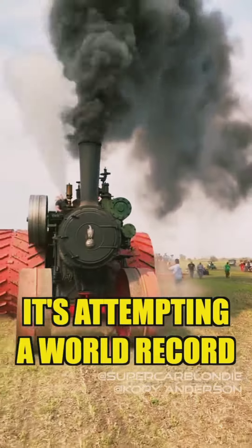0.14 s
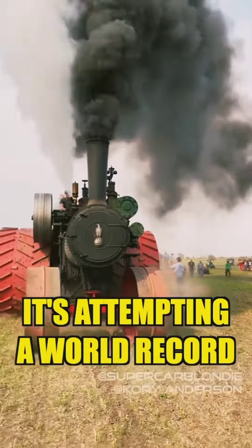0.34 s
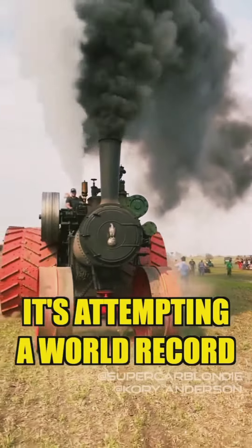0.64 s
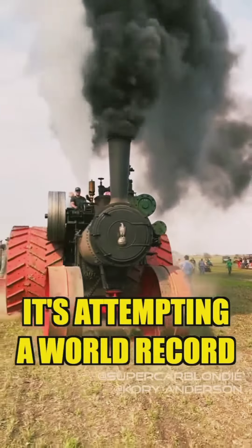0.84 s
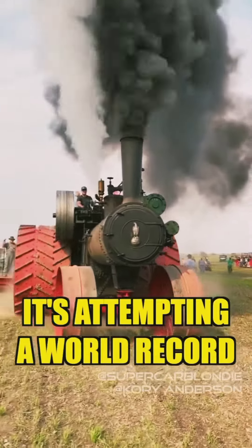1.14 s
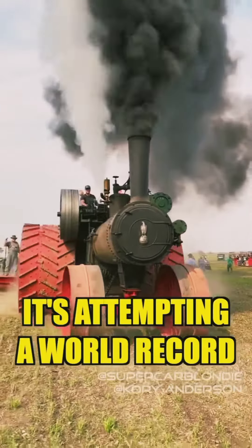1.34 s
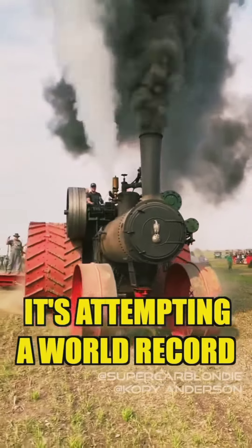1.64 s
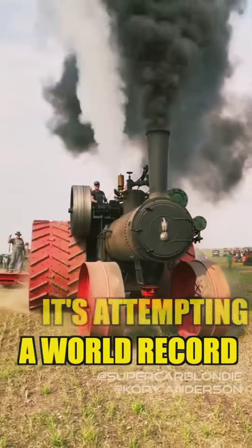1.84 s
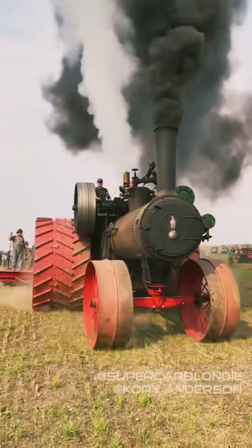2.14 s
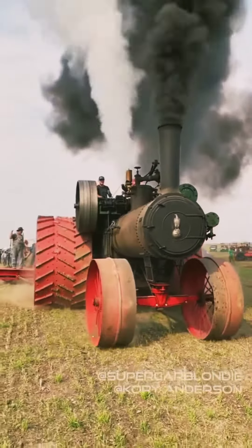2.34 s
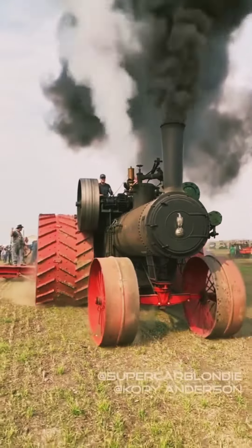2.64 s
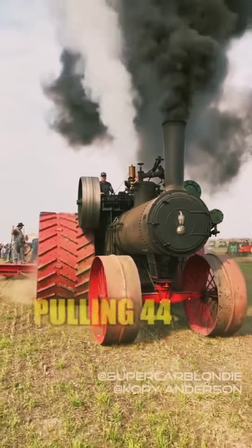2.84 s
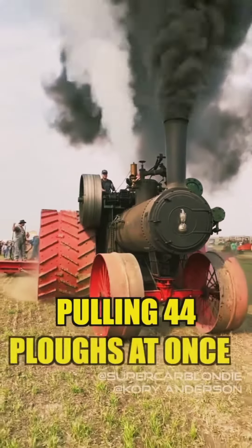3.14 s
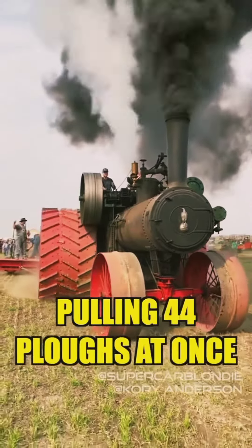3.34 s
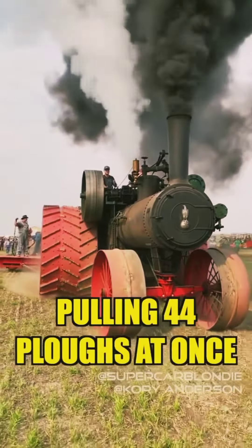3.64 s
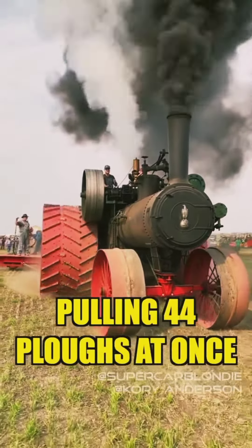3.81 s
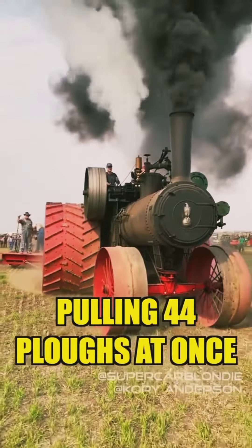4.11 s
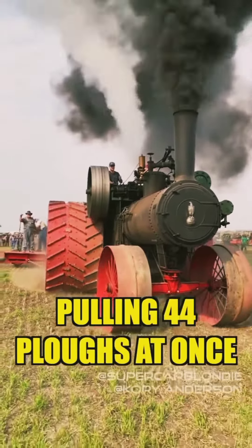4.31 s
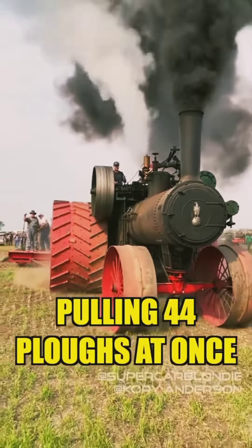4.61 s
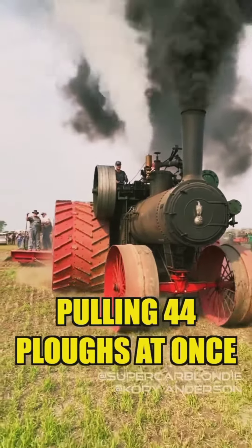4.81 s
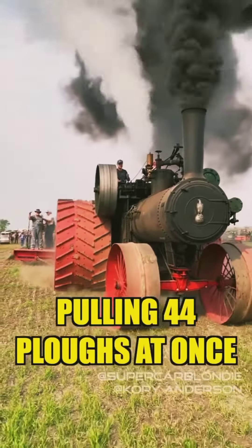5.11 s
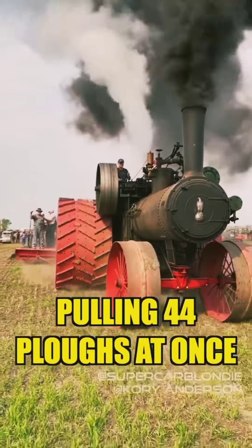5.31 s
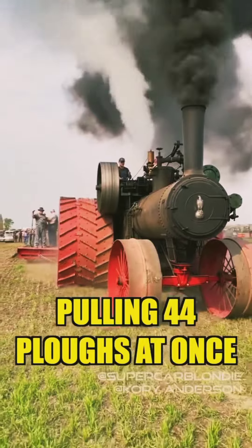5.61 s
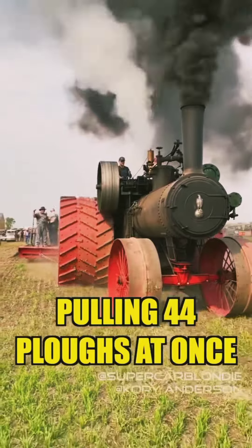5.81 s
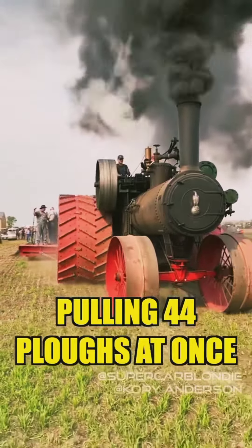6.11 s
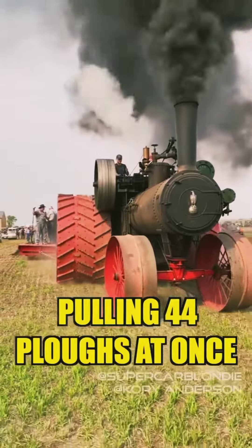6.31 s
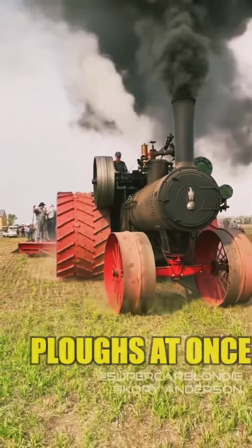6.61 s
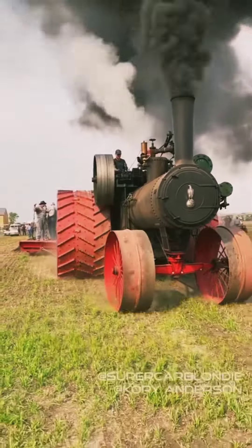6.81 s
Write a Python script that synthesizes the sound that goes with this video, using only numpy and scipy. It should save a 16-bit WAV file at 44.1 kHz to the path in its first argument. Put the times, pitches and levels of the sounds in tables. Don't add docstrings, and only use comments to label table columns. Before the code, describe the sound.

In an open field, a large steam engine barks low, rapid exhaust beats over gear rumble while wind buffets the microphone. Almost at once a safety valve slams open, bounces, and blasts a long, bright hiss that buries the engine. The jet slowly softens and wavers, slightly hollow from ground echo, then snaps shut, leaving faint chugging, flat machinery rumble and thin steam leaks.

```python
import sys
import numpy as np
from scipy import signal
from scipy.fft import rfft, irfft, next_fast_len
from scipy.io import wavfile
from scipy.ndimage import uniform_filter1d

SR = 44100
rng = np.random.default_rng(int(sys.argv[2]) if len(sys.argv) > 2 else 0)


def invert_db(level):
    return 10 ** (np.asarray(level, dtype=float) / 20)


def store_pcm(level_fs):
    pcm = np.round(np.clip(level_fs, -1, 1) * 32767).astype(np.int16)
    wavfile.write(sys.argv[1], SR, np.atleast_2d(pcm).T)


N = 306495

# time [s], roar level [dB].
FLOW = [(.2, -15.5), (.27, -17.5), (.36, -16.5), (.5, -17.5), (.9, -17), (1.05, -21.5), (1.35, -21.5),
        (1.85, -23), (2.1, -24.5), (2.5, -25.5), (2.95, -23.5), (4.0, -23.5), (4.47, -25.5), (4.9, -23.5),
        (5.35, -26), (5.88, -23), (6.0, -30)]
# start [s], extra level [dB], decay [s].
POPS = [
    (0.202, 11.5, 0.018),
    (.405, 8.5, 0.016),
]
# centre [s], extra level [dB], half length [s].
FLUTTERS = [(0.33, 2.5, .02), (0.423, 1.5, 0.013), (0.602, -4, 0.012), (0.664, 1, 0.027),
            (0.963, -4, 0.014), (0.992, 1, 0.0083), (1.32, 1.5, 0.019), (2.036, 3.5, 0.043),
            (4.067, 0.5, 0.02), (5.827, -3.5, 0.018), (5.973, 1, .015)]
# centre [s], peak [dB], half length [s].
PUFFS = [
    (0.19, -41, 0.017),
    (0.308, -28.5, 0.034),
    (0.626, -33.5, 0.018),
    (0.706, -35.5, 0.035),
    (0.777, -39, 0.013),
    (1.046, -56, 0.029),
    (1.178, -49, 0.09),
]
# time [s], level [dB].
SIDE_RUSH = [(0, -38), (.15, -48), (.21, -21), (.3, -38), (.5, -30.5), (.8, -38), (1.0, -48), (1.4, -54)]
# time [s], first notch [Hz], echo share [0-1].
GROUND = [(.2, 650, 0), (.7, 700, 0), (1.1, 740, 0.19), (1.35, 920, 0.35), (1.5, 870, 0.6),
          (1.78, 900, 0.66), (2.1, 1057, 0.64), (2.4, 900, 0.25), (2.85, 990, 0.25), (3.5, 925, 0.27),
          (3.8, 880, 0), (4.05, 1000, 0.46), (4.4, 930, 0.18), (5.25, 980, 0.17), (5.6, 910, 0)]
# frequency [Hz], density [dB per Hz].
JET_ROAR = [(500, -46.5), (800, -29), (1100, -7), (1500, -1), (2200, -0.5), (3200, -1.5), (4300, -2.5),
            (4800, -1), (5300, -8)]
# frequency [Hz], density [dB per Hz].
JET_EDGE = [(4500, -22), (5100, 1.5), (6200, 1), (7500, 1), (8200, -2)]
# frequency [Hz], density [dB per Hz].
JET_TOP = [(7200, -44), (7900, -6.5), (10000, -2.5), (10400, -4.5), (11700, 2), (12200, -4), (13100, -1.5)]
# frequency [Hz], density [dB per Hz].
JET_BODY = [(150, -8.5), (300, -9.5), (450, -3.5), (600, 2.5), (900, 0), (1100, -36), (1500, -18)]
# centre [s], peak [dB], half length [s], pitch [Hz].
BAND_SWELLS = [
    (3.1, -38.5, 0.65, 1130),
    (4.8, -37, 0.17, 1150),
    (5.8, -38, 0.17, 826),
    (1.27, -48.5, 0.22, 310),
    (5.45, -37.5, 0.12, 1175),
]
# frequency [Hz], level [dB], roughness [0-1].
CHIMNEY = [(169.6, 2.5, 0.37), (270.7, -4, 0.72), (385, -18.5, 1), (555, -17, 0.94), (869, -15.5, 0.66)]
# time [s],
# peak [dB].
BEATS = [(.025, -5.5), (.075, -9), (.165, -19), (.195, -13.5), (.481, -34), (.563, -29), (.7, -46),
         (.765, -40), (6.638, -28.5), (6.705, -38), (6.795, -37), (6.834, -35), (6.935, -38),
         (.88, -50), (1.076, -48), (1.188, -41), (1.405, -54), (1.583, -46), (1.74, -53), (1.947, -46),
              (2.048, -65), (2.224, -59), (2.431, -51), (2.6, -56), (2.76, -48), (2.927, -44),
              (3.076, -47.5), (3.252, -47), (3.408, -41), (3.568, -46), (3.782, -48), (3.9, -56),
              (4.126, -46), (4.26, -50), (4.44, -46), (4.635, -46), (4.784, -47), (4.967, -45), (5.14, -52),
              (5.338, -60), (5.429, -51), (5.62, -52), (5.781, -52), (5.966, -43), (6.139, -47),
              (6.297, -42), (6.486, -48)]
# time [s], machinery [dB], leak [dB].
WORKS = [(0, -17, -36), (.04, -18.5, -31), (.09, -26.5, -40), (.14, -31, -41), (.19, -12.5, -43),
         (.24, -64, -59), (5.95, -40, -25.5), (6.02, -45.5, -33.5), (6.35, -45.5, -34), (6.42, -44, -34),
         (6.49, -44.5, -32), (6.63, -42.5, -30.5), (6.8, -41, -33), (6.95, -42.5, -30)]
# frequency [Hz], density [dB per Hz].
NEAR_WORKS = [(250, -2), (400, -3), (1000, -6), (2000, -12), (4000, -20), (6000, -24.5), (9000, -34),
              (13000, -51)]
# frequency [Hz], density [dB per Hz].
FAR_WORKS = [(150, -17), (400, -2.5), (1300, 1.5), (2800, 0.5), (3700, -12.5), (4500, -2), (6000, -11),
             (7500, -28)]
# frequency [Hz], density [dB per Hz].
LEAK = [(3000, -12), (5200, -12.5), (7500, -11), (9000, -4.5), (10000, -3.5), (12500, -2.5), (13100, -13)]
# time [s], level [dB].
WIND = [(0, -18), (.166, -18), (.26, -35), (.33, -39), (.36, -31), (.385, -48), (.42, -24), (.5, -28),
        (.64, -29.5), (.7, -38), (.76, -29), (.82, -44.5), (1.6, -45.5), (2.3, -54.5), (4.5, -56.5),
        (6.4, -60), (6.63, -57), (6.95, -49)]
# frequency [Hz], density [dB per Hz].
BUFFET = [(15, -39), (45, -8.5), (80, -6), (130, -7.5), (200, -12.5), (300, -19), (500, -27)]
# frequency [Hz], side minus mid [dB].
WIDTH = [(20, -28), (150, -35.5), (400, -23), (600, -7.5), (1250, 0.5), (1600, -16), (2200, -21.5),
         (3300, -16), (4000, -5), (5500, -2.5), (8000, 0), (12000, -3)]
# frequency [Hz], level against the moment's loudness [dB].
MASKED = [(20, -60), (300, -32), (600, -16), (1000, -14), (2000, -9.5), (3200, -10.5), (4000, -12),
          (5600, -12), (7500, -13), (14000, -13)]
# start [s], length [s].
DIP_SILENT = [(.05, .07), (2.17, .25), (2.53, .13), (5.17, .12), (5.94, .06), (6.62, .31)]
# start [s], length [s].
TOP_SILENT = [(1.84, .09), (4.14, .09), (4.68, .05), (5.19, .09)]
# start [s], length [s].
EARLY_SILENT = [(.04, .09)]
# start [s], length [s], centre [Hz].
THIN_GAPS = [(6.05, .12, 5350), (6.07, .09, 5980), (6.1, .07, 5600), (6.06, .18, 3900), (6.07, .1, 3400),
             (6.12, .12, 3050), (6.06, .06, 1700), (6.27, .1, 3350), (6.3, .12, 2350), (6.27, .17, 4230),
             (6.36, .2, 3020), (6.43, .06, 5300), (6.47, .05, 3380), (6.63, .13, 5330), (6.68, .14, 3280)]
# start [s], length [s], low [Hz], high [Hz].
HOLLOW_SILENT = [(.74, .1, 560, 720), (.81, .08, 420, 900), (.87, .05, 560, 1080), (.9, .14, 560, 920),
                 (1.02, .14, 560, 680), (1.08, .08, 680, 950), (1.16, .16, 600, 720), (1.22, .1, 920, 1000),
                 (1.31, .09, 700, 970), (1.7, .15, 800, 1000), (1.86, .13, 910, 1050),
                 (2.03, .14, 910, 1050), (3.98, .1, 970, 1080), (6.63, .2, 10250, 10500)]

LIFT_DB_PER_S, SEAT_DB_PER_S = 551, 480
EDGE_DB, EDGE_SAG_DB_PER_S = -5.5, 0.4
TOP_DB, TOP_FOLLOWS, TOP_FADES_S, TOP_FADE_DB_PER_S = -24.5, 0.15, 4.74, 3
BODY_DB, HOLLOW_DB, FILLS_S, FILL_S = -37, -16.5, 1.29, 0.21
CRACKLE_DB, CRACKLE_PER_S = 0.9, 200
BAND_HALF_WIDTH = 0.14
LULL_DB = 2
COLOUR_DIP_HZ, COLOUR_DIP_WIDTH_HZ = 4900, 210
DIP_WANDER_HZ, DIP_HALF_HZ = 80, 150
FRAME, FRAME_START = 1024, 201
STREAK_DB = 3.0
DIP_SILENT_HZ, TOP_SILENT_HZ, EARLY_SILENT_HZ = (4730, 5100), (7900, 9900), (10300, 12000)
THIN_HALF_HZ = 75
FAINT_SIDE_HZ, FAINT_SIDE_DB = 450, -18
STARVED_FROM_HZ, STARVED_BAND_HZ = 7580, 689
STARVED_PERCENT = (21, 46)


def in_time(rows):
    s, *columns = np.transpose(rows)
    return [np.interp(np.arange(N) / SR, s, c) for c in columns]


def at_hz(points, hz):
    points = np.array(points)
    return np.interp(np.log(hz), np.log(points[:, 0]), points[:, 1], left=-90, right=-90)


def bumps(rows):
    s, _, half_s = np.transpose(rows)[:, :, None]
    return np.exp(-((np.arange(N) / SR - s) / half_s) ** 2)


def drift(rate_hz):
    r = np.exp(-80 * np.pi * rate_hz / SR)
    slow = signal.lfilter([1], [1, -2 * r, r * r], rng.standard_normal(N // 40 + 2002))[2000:]
    return np.interp(np.arange(N) / 40, np.arange(len(slow)), slow / np.std(slow))


def turbulence(spectrum, patchy_db, flicker_hz, wide_db=0.0, count=5):
    size = next_fast_len(N)
    hz = np.arange(1, size // 2 + 2) * SR / size
    width_hz, width_db = np.transpose(WIDTH)
    side_db = wide_db + np.interp(np.log(hz), np.log(width_hz), width_db)
    colour = invert_db(at_hz(spectrum, hz) + np.array([[0], [1]]) * side_db)
    lines = rfft(rng.standard_normal((2, size))) * colour
    low_hz, high_hz = spectrum[0][0], spectrum[-1][0]
    place = np.clip(np.log(hz / low_hz) / np.log(high_hz / low_hz), 0, 1) * (count - 1)
    out, together = 0, drift(flicker_hz / 2)
    for k in range(count):
        band = irfft(lines * np.clip(1 - abs(place - k), 0, 1), size)[:, :N]
        out = out + band * invert_db(patchy_db * (0.34 * together + drift(flicker_hz)))
    return out / np.std(out[0])


def safety_valve():
    t = np.arange(N) / SR
    slam_db = sum(db * np.exp(-np.clip(t - s, 0, 1) / decay_s) * (t > s) for s, db, decay_s in POPS)
    common = invert_db(slam_db + CRACKLE_DB * drift(CRACKLE_PER_S))
    roar, edge, top, body = jet_levels(t) * common
    low = roar * turbulence(JET_ROAR, 0.26, 11.5, count=4)
    low = low + body * invert_db(-4) * turbulence(JET_BODY, 0.74, 1.9, count=2)
    notch_hz, share = in_time(GROUND)
    low[0] = ground_echo(low[0], notch_hz, share)
    rush = turbulence([(30, 2), (200, 0), (500, 1.5), (900, -6)], 1.7, 17.0, count=2)[0]
    low[1] += invert_db(in_time(SIDE_RUSH)[0]) * (t < SIDE_RUSH[-1][0]) * rush
    edge_hiss = edge * turbulence(JET_EDGE, 1.77, 18.0, count=2)
    top_hiss = top * turbulence(JET_TOP, 1.65, 23.0, count=4)
    return low + edge_hiss + top_hiss


def jet_levels(t):
    gate_db = -LIFT_DB_PER_S * np.clip(FLOW[0][0] - t, 0, None)
    gate_db = gate_db - SEAT_DB_PER_S * np.clip(t - FLOW[-1][0], 0, None)
    flow_db = in_time(FLOW)[0] + np.array(FLUTTERS)[:, 1] @ bumps(FLUTTERS)
    edge_db = flow_db + EDGE_DB - EDGE_SAG_DB_PER_S * t
    top_db = TOP_DB + TOP_FOLLOWS * (flow_db - FLOW[-2][1])
    top_db = top_db - TOP_FADE_DB_PER_S * np.clip(t - TOP_FADES_S, 0, None)
    body_db = BODY_DB + HOLLOW_DB * (1 - np.tanh((t - FILLS_S) / FILL_S)) / 2
    roar, edge, top, body = invert_db(np.array([flow_db, edge_db, top_db, body_db]) + gate_db)
    puffs = invert_db(np.array(PUFFS)[:, 1]) @ bumps(PUFFS)
    return np.array([roar, edge, top, body + puffs])


def ground_echo(x, notch_hz, share):
    dull = signal.sosfiltfilt(signal.butter(2, 1900.0, fs=SR, output="sos"), x)
    return x + share * np.interp(np.arange(N) - SR / (2 * notch_hz), np.arange(N), dull)


def band_swells():
    out = 0
    for s, db, half_s, hz in BAND_SWELLS:
        resonance = [(hz * (1 - BAND_HALF_WIDTH), -8), (hz, 0), (hz * (1 + BAND_HALF_WIDTH), -8)]
        swell = invert_db(db) * bumps([(s, db, half_s)])[0]
        out = out + swell * turbulence(resonance, 1.0, 14.0, count=2)
    return out


def exhaust():
    t, swell = np.arange(N) / SR, np.zeros(N)
    for s, db in BEATS:
        near = slice(max(int((s - 0.1) * SR), 0), int((s + 0.3) * SR))
        late_s = t[near] - s
        rise = np.exp(-(late_s / 0.03) ** 2)
        fall = np.exp(-(np.clip(late_s, 0, None) / 0.022) ** 1.3)
        swell[near] += invert_db(db) * np.where(late_s < 0, rise, fall)
    upper = invert_db(np.where(t < 0.3, 1.5, -15.0))
    out = np.zeros(N)
    for k, (hz, db, rough) in enumerate(CHIMNEY):
        phase = np.cumsum(2 * np.pi * hz * (1 + 0.0392 * drift(26.0)) / SR)
        rasp = 1 - rough + rough * drift(35.0)
        out += invert_db(db) * np.sin(phase) * rasp * (upper if k else 1)
    return swell * upper, swell * out * invert_db(3.0)


def machinery(swell):
    works_db, leak_db = in_time(WORKS)
    far = turbulence(FAR_WORKS, 1.0, 24.0, wide_db=-11, count=4)
    far[0] += 0.031 * np.roll(far[0], round(0.00206 * SR))
    near = turbulence(NEAR_WORKS, 1.3, 6.0, wide_db=-12.0, count=2)
    works = invert_db(works_db + 2.5) * np.where(np.arange(N) < 0.23 * SR, near, far)
    leaks = invert_db(leak_db) * turbulence(LEAK, 1.5, 16.0, count=3)
    return works + invert_db(-37.0) * swell * near + leaks


def wind():
    gust_db = in_time(WIND)[0] + LULL_DB * drift(11.0) + 1.0
    return invert_db(gust_db) * turbulence(BUFFET, 1.8, 19.0, wide_db=13.0, count=2)


def scene():
    swell, chimney = exhaust()
    mid, side = safety_valve() + band_swells() + machinery(swell) + wind()
    mid = mid + chimney
    side = side + invert_db(-32) * np.roll(chimney, 60)
    return np.array([mid + side, mid - side])


def mute(heard, hz, t, start_s, length_s, low_hz, high_hz):
    heard &= ~np.outer((hz > low_hz) & (hz < high_hz), (t > start_s) & (t < start_s + length_s))


def fed_bands(quiet):
    luck = rng.standard_normal((2, 10, len(quiet)))
    luck = (luck + np.roll(luck, 1, axis=2) + 0.2 * np.roll(luck, 2, axis=2)
            + 0.4 * np.roll(luck, 1, axis=1))
    luck[:, 8:] += 1.2
    luck[:, :, quiet] += np.array([1.2, -0.6])[:, None, None]
    fed = np.array([v > np.percentile(v, percent) for v, percent in zip(luck, STARVED_PERCENT)])
    fed[:, 0] = True
    return fed


def spectral_gate(left_right):
    left, right = left_right
    lead = FRAME - FRAME_START
    pair = np.pad(np.array([left + right, left - right]) / 2, ((0, 0), (lead, 0)))
    window = signal.windows.kaiser_bessel_derived(2 * FRAME, 4 * np.pi)
    hz, t, lines = signal.stft(pair, SR, window, nperseg=2 * FRAME, noverlap=FRAME)
    t = t - lead / SR

    streaks = uniform_filter1d(rng.standard_normal(lines.shape), size=3, axis=1)
    streaks = uniform_filter1d(streaks, size=5, axis=2)
    frame_level = abs(lines[0]).mean(axis=0)
    quiet = frame_level < 0.5 * np.median(frame_level)
    streak_db = STREAK_DB * np.where(quiet, 1.25, 0.85) * streaks / streaks.std()
    lines = lines * invert_db(streak_db * (hz > 250)[:, None])

    power = uniform_filter1d(uniform_filter1d(abs(lines) ** 2, size=3, axis=1), size=3, axis=2)
    loudness = power[0, (hz > 4000) & (hz < 13000)].mean(axis=0)
    heard = power > loudness * invert_db(2 * at_hz(MASKED, hz + 21))[:, None]
    low = hz < 1000
    heard[1, low] |= abs(lines[1, low]) > abs(lines[0, low])
    faint = hz < FAINT_SIDE_HZ
    heard[1, faint] &= power[1, faint].mean(axis=0) > loudness * invert_db(2 * FAINT_SIDE_DB)

    for spells, band_hz in ((DIP_SILENT, DIP_SILENT_HZ), (TOP_SILENT, TOP_SILENT_HZ),
                            (EARLY_SILENT, EARLY_SILENT_HZ)):
        for start_s, length_s in spells:
            mute(heard, hz, t, start_s, length_s, *band_hz)
    for start_s, length_s, gap_hz in THIN_GAPS:
        mute(heard, hz, t, start_s, length_s, gap_hz - THIN_HALF_HZ, gap_hz + THIN_HALF_HZ)
    for start_s, length_s, low_hz, high_hz in HOLLOW_SILENT:
        mute(heard[0], hz, t, start_s, length_s, low_hz, high_hz)

    frames = np.clip(t * SR, 0, N - 1).astype(int)
    gap_hz = COLOUR_DIP_HZ + DIP_WANDER_HZ * drift(3)[frames]
    heard &= abs(hz[:, None] - gap_hz) > DIP_HALF_HZ * drift(5)[frames]

    band = np.clip((hz - STARVED_FROM_HZ) // STARVED_BAND_HZ + 1, 0, 9).astype(int)
    kept = lines * heard * fed_bands(quiet)[:, band]
    gated = signal.istft(kept, SR, window, nperseg=2 * FRAME, noverlap=FRAME)[1]
    mid, side = gated[:, lead:][:, :N]
    return np.array([mid + side, mid - side])


def roll_off(x):
    return signal.sosfilt(signal.butter(12, 13010, fs=SR, output="sos"), x)


def record(dry):
    b, a = signal.iirnotch(COLOUR_DIP_HZ, COLOUR_DIP_HZ / COLOUR_DIP_WIDTH_HZ, SR)
    dipped = signal.lfilter(b, a, signal.lfilter(b, a, dry))
    rounded = 0.95 * np.tanh(dipped / 0.93)
    return roll_off(spectral_gate(rounded))


dry = scene()
out = record(dry)
store_pcm(out)
```